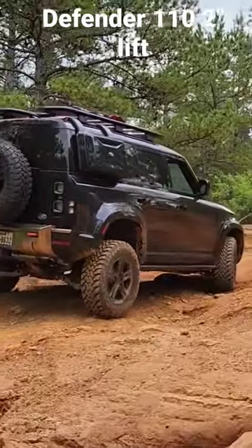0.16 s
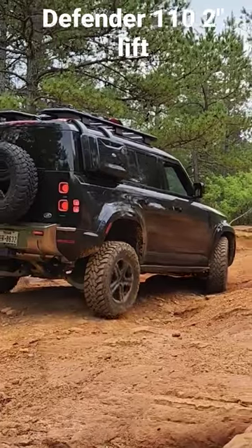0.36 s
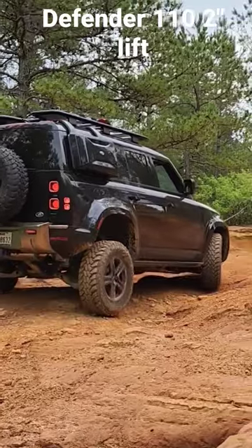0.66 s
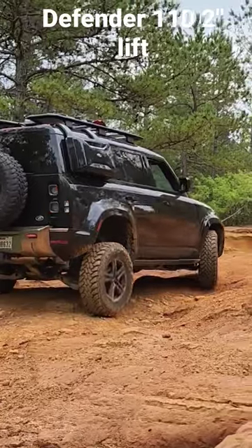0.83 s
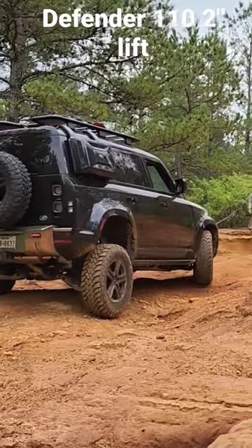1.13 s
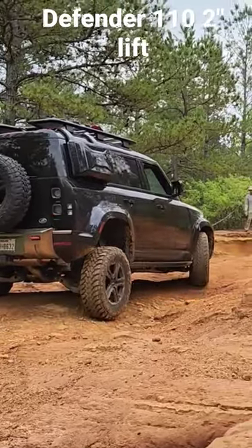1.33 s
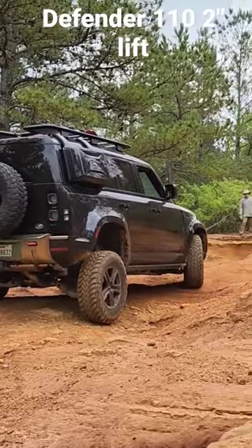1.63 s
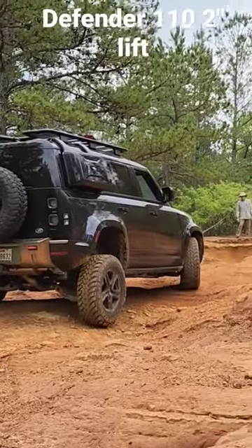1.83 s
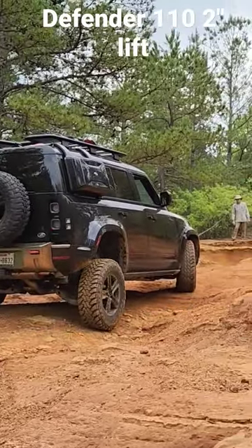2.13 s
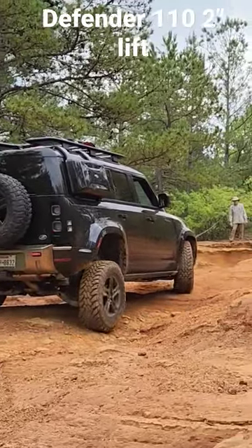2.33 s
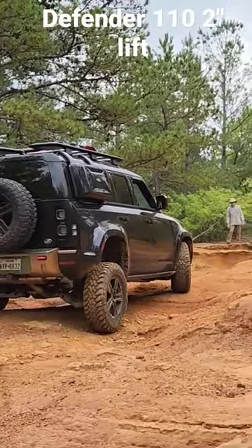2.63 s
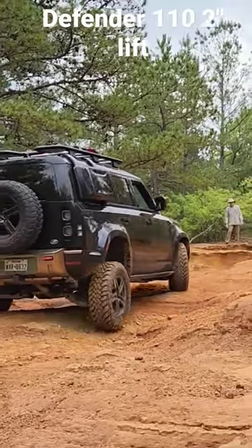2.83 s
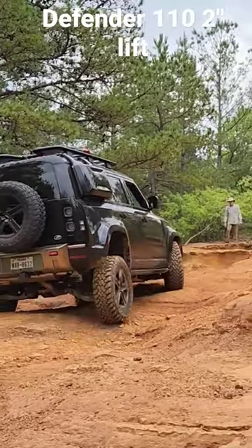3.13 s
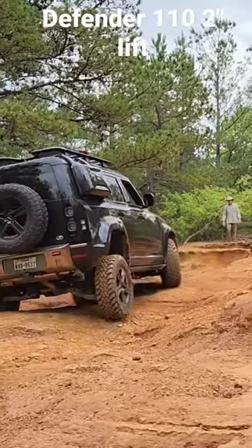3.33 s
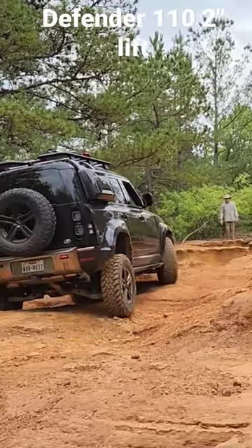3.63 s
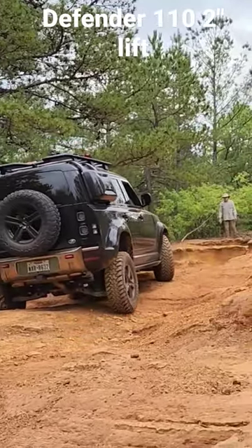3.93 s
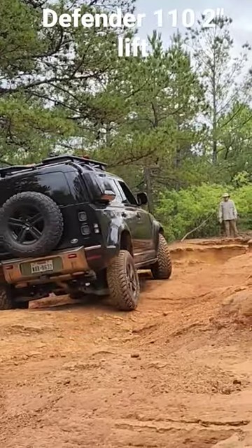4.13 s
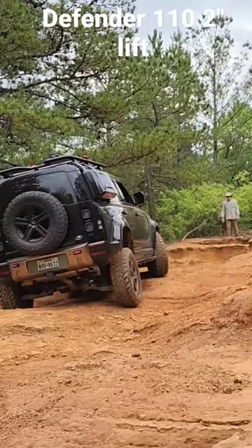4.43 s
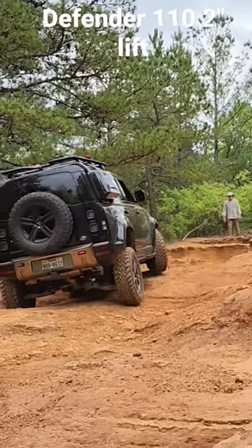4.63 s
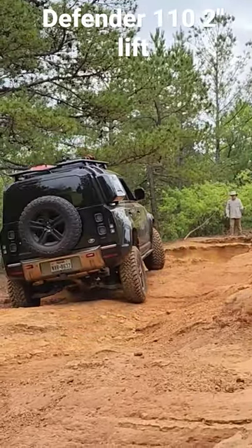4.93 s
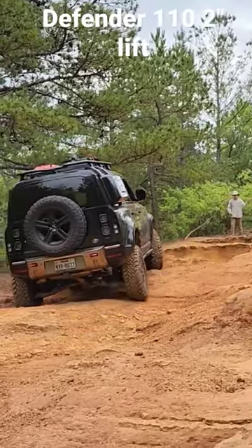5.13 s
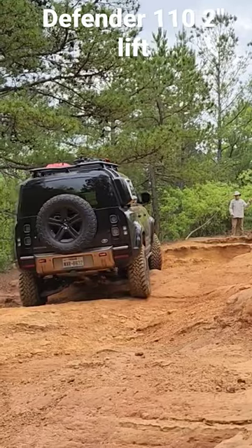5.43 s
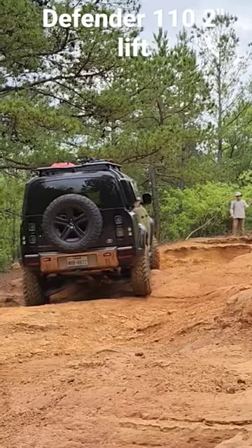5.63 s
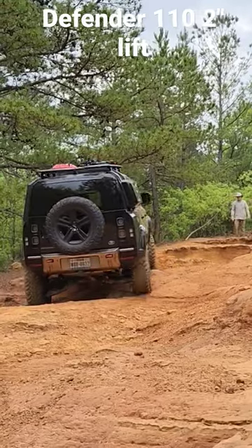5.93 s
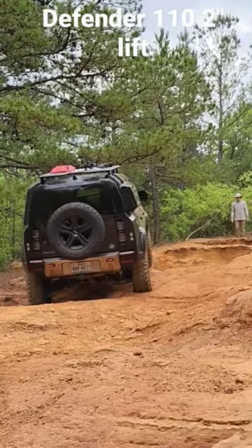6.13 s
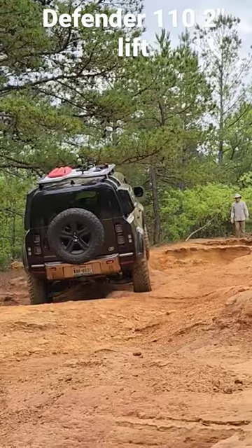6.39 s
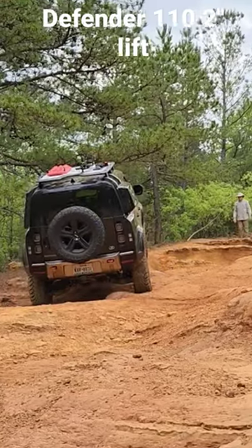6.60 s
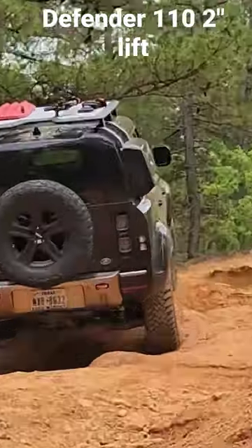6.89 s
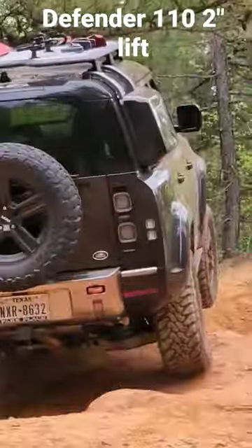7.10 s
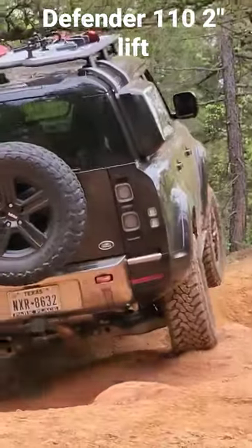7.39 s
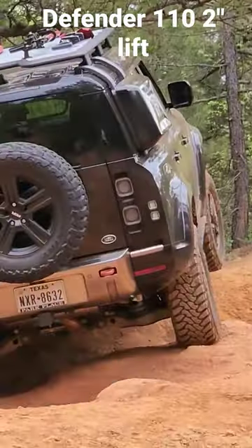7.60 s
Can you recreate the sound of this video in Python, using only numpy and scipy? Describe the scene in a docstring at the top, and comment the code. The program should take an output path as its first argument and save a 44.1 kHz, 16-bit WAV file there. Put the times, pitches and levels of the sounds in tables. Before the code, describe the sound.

A four-wheel-drive engine drones under load on a dirt trail, sagging, then revving higher, with underbody knocks and crunching grit.

```python
"""The exhaust of a six-cylinder four-wheel-drive crawling up a rocky dirt trail, heard from behind.
Its pulses drone through the pipe on the firing rate, which sags as a wheel hangs and climbs again.
The underbody rumbles, roars and rings with knocks, tyres crunch grit, the engine bay hisses, a thin
whine swells and the driveline groans under the hardest pull. Far off a cricket chirps.
The microphone stands in the open, near a dirt bank, and picks it all up through two unlike ports."""
import sys
import numpy as np
from scipy import signal
from scipy.fft import rfft, irfft, next_fast_len
from scipy.io import wavfile
from scipy.ndimage import uniform_filter1d

SR = 44100
rng = np.random.default_rng(int(sys.argv[2]) if len(sys.argv) > 2 else 0)


def master(y):
    """Save y as 16-bit WAV."""
    cut = np.clip(np.atleast_2d(y).T, -1, 1)
    pcm = np.round(cut * 32767)  # scale
    wavfile.write(sys.argv[1], SR, pcm.astype(np.int16))


N = 341889
TIME = np.arange(N) / SR


def from_db(db):
    """Gain of a level."""
    return 10 ** (np.asarray(db) / 20)


def rms_one(x):
    """Scale to rms 1."""
    return x / np.sqrt(np.mean(x ** 2) + 1e-20)


def in_time(rows):
    """Every column of a table after its time column, sample by sample."""
    times, *columns = np.transpose(rows)
    return [np.interp(TIME, times, column) for column in columns]


def at_hz(points, hz):
    """Read a spectrum on a log frequency axis."""
    freqs, values = np.transpose(points)
    return np.interp(np.log(hz), np.log(freqs), values)


def drift(rate_hz):
    """Slow random wander of rms 1."""
    pole = np.exp(-80 * np.pi * rate_hz / SR)
    slow = signal.lfilter([1], [1, -2 * pole, pole ** 2], rng.standard_normal(N // 40 + 2002))[2000:]
    return np.interp(np.arange(N) / 40, np.arange(len(slow)), rms_one(slow))


def bandpass(x, low_hz, high_hz, order=2):
    """Keep one band."""
    return signal.sosfilt(signal.butter(order, [low_hz, high_hz], "band", fs=SR, output="sos"), x)


def resonate(x, hz, width_hz):
    """A resonance with gain 1 at its peak."""
    r, w = np.exp(-np.pi * width_hz / SR), 2 * np.pi * hz / SR
    return signal.lfilter([(1 - r * r) / 2, 0, (r * r - 1) / 2], [1, -2 * r * np.cos(w), r * r], x)


def phase_lag(hz, centre_hz, q):
    """Radians by which a resonance delays a tone."""
    return np.arctan2(hz * centre_hz / q, centre_hz ** 2 - hz ** 2)


def strike(clicks, hz, t60, contact_cycles=.4):
    """A soft blow, lasting part of a cycle, sets one mode ringing."""
    contact = np.hanning(round(contact_cycles * SR / hz) + 2)
    r, w = from_db(-60 / (t60 * SR)), 2 * np.pi * hz / SR
    blow = contact / contact.sum() * np.sin(w)
    return signal.lfilter(blow, [1, -2 * r * np.cos(w), r * r], clicks + 1e-18)


def swell(centre_s, width_s):
    """A bell-shaped envelope of height 1."""
    return np.exp(-.5 * ((TIME - centre_s) / width_s) ** 2)


def bursts(times, levels_db, decays_s):
    """Envelopes that jump up and die away."""
    out = np.zeros(N)
    for start, db, decay in zip(times, levels_db, decays_s):
        at = round(start * SR)
        t = TIME[:min(N - at, SR // 5)]
        out[at:at + len(t)] += from_db(db) * np.exp(-t / decay) * np.minimum(t / .0007, 1)
    return out


def stereo_white():
    """A shared and an opposed white noise."""
    return rng.standard_normal((2, N))


# how alike diffuse sound is at the two microphone ports: (frequency [Hz], likeness [0-1])
PORT_LIKENESS = [(200, 0.97), (500, .9), (800, 1), (1050, 0.1), (1500, 0.3), (1900, 0.1), (2400, 0),
                 (3600, 0.4), (5500, 0.2), (9000, 0)]

def spread(pair, hz):
    """Mix shared and opposed parts into left and right."""
    alike = at_hz(PORT_LIKENESS, hz)
    return np.sqrt(1 + alike) * pair[0] + np.sqrt(1 - alike) * pair[1] * [[1], [-1]]


def banded_noise(spectrum, flicker_db, flicker_hz):
    """Third-octave bands of stereo noise, flickering partly together and partly alone; rms 1."""
    low_hz, high_hz = spectrum[0][0], spectrum[-1][0]
    edges = np.geomspace(low_hz, high_hz, round(3 * np.log2(high_hz / low_hz)) + 1)
    out, together, white = 0, drift(flicker_hz / 2), [stereo_white(), stereo_white()]
    for k, (low, high) in enumerate(zip(edges, edges[1:])):
        hz = np.sqrt(low * high)
        level_db = at_hz(spectrum, hz) + flicker_db * (0.7 * together + drift(flicker_hz))
        out = out + from_db(level_db) * spread(bandpass(white[k % 2], low, high), hz)
    return rms_one(out)


# a cricket, far off the trail: (time [s], rms level at the crest [dB])
CRICKET_CALLS = [(3.553, -60.5), (6.8, -60)]

def cricket(hz=4480, width_s=.009, gap_s=.044):
    """Each call is a pair of short pure chirps."""
    chirps = sum(from_db(db) * swell(s + gap, width_s) for s, db in CRICKET_CALLS for gap in (0, gap_s))
    return np.sqrt(2) * chirps * np.sin(2 * np.pi * hz * TIME)


# low rumble under the vehicle: (time [s], level [dB])
RUMBLE_LEVEL = [(0, -40), (1.0, -38.5), (2.5, -37), (4.0, -37), (4.6, -39.5), (5.6, -38), (6.6, -37),
                (7.0, -29), (7.75, -37.5)]
# its spectrum: (frequency [Hz], relative level [dB])
RUMBLE_SPECTRUM = [(20, -26.5), (35, -3), (55, 11.5), (90, -10.5), (150, -1.5), (230, -12), (330, -12.5),
                   (500, -35.5)]

def rumble():
    """The underbody rumbles with deep, uneven noise."""
    noise = banded_noise(RUMBLE_SPECTRUM, flicker_db=3, flicker_hz=6.2)
    return from_db(in_time(RUMBLE_LEVEL)[0]) * noise


# wheels slipping on the trail: (time [s], level [dB], fade [s])
WHEEL_SLIPS = [(3.979, -31, 0.36), (5.153, -25.5, 0.085), (6.03, -35, 0.12), (6.35, -29.5, 0.089),
               (6.77, -33.5, 0.51), (7.399, -38.5, 0.7)]

def chassis_shudder(hz=50.5, width_hz=38, rise_s=.04):
    """Noise in a low chassis resonance rises quickly at each slip and fades."""
    level = sum(from_db(db) * np.exp(np.where(TIME < s, (TIME - s) / rise_s, (s - TIME) / fade))
                for s, db, fade in WHEEL_SLIPS)
    lumps = resonate(rng.standard_normal(N), hz, width_hz)
    return level * rms_one(resonate(lumps, hz, width_hz))


# hiss from the engine bay, at the far end of the vehicle: (frequency [Hz], relative level [dB])
BAY_SPECTRUM = [(710, -31), (1200, -0.5), (1560, -3.5), (1780, -5), (1980, -8), (2780, -2), (5210, -3.5),
                (6360, -11), (7510, -22), (8000, -28), (10400, -51.5), (17600, -120)]
# metal parts in the bay: (frequency [Hz], width [Hz], gain [dB])
BAY_MODES = [(1560, 280, 4.5), (2021, 110, 9.5), (2330, 100, 0.5), (3680, 20, 1), (4330, 32, -6),
             (4850, 63, -5.5), (5400, 470, -9), (5740, 46, -1)]

def engine_bay():
    """Broad hiss with metal parts ringing in it; rms 1."""
    hiss = banded_noise(BAY_SPECTRUM, flicker_db=1, flicker_hz=17)
    rings = sum(from_db(db + 3 * drift(8)) * resonate(hiss, hz, width) for hz, width, db in BAY_MODES)
    return rms_one(hiss + rings)


# noise of the moving vehicle: (time [s], bay hiss [dB], underbody roar [dB], tyre sizzle [dB])
RUNNING_LEVELS = [(0.0, -52.5, -49, -69), (0.75, -51.5, -44.5, -64), (1.01, -54.5, -48.5, -70),
                  (1.53, -56.5, -49.5, -68.5), (1.7, -53, -46.5, -66.5), (2.19, -55.5, -46, -70),
                  (2.6, -53.5, -48, -68), (2.9, -53, -50, -69), (3.42, -55.5, -50, -66.5),
                  (3.78, -55.5, -50.5, -71), (4.09, -57.5, -49, -72.5), (4.67, -56, -50, -70.5),
                  (5.2, -57.5, -51, -75.5), (5.74, -54.5, -50, -70), (6.66, -56.5, -49.5, -76.5),
                  (7.1, -49.5, -41.5, -70.5), (7.24, -47.5, -44.5, -69), (7.72, -52.5, -50, -68)]
# roar from the underbody: (frequency [Hz], relative level [dB])
ROAR_SPECTRUM = [(180, -37.5), (300, -1), (483, -11.5), (566, 3), (724, -11), (883, -16), (1030, -13.5),
                 (1820, -25), (2000, -20.5), (2600, -44.5), (4400, -120)]
# sizzle of tyres on dirt: (frequency [Hz], relative level [dB])
SIZZLE_SPECTRUM = [(7000, -6), (8000, -2), (10800, -8), (12800, -13), (16000, -1.5)]

def running_noise(firing_phase, pump_depth=.16):
    """The underbody roars, pumped by each firing, while the bay hisses and the tyres sizzle."""
    hiss_db, roar_db, sizzle_db = in_time(RUNNING_LEVELS)
    roar = from_db(roar_db) * banded_noise(ROAR_SPECTRUM, flicker_db=2.5, flicker_hz=28)
    hiss = from_db(hiss_db) * engine_bay()
    sizzle = from_db(sizzle_db) * banded_noise(SIZZLE_SPECTRUM, flicker_db=1.5, flicker_hz=12)
    return roar * (1 + pump_depth * np.cos(firing_phase)) + hiss + sizzle


# roughness of the trail: (time [s], level against the roar [dB])
TRAIL_ROUGHNESS = [(0, -4), (3.9, 1.5), (4.2, 0), (6.6, -1.5), (6.9, 0.5), (7.7, 8.5)]

def ground_shaking():
    """How hard the ground shakes the panels and throws stones, in dB."""
    _, roar_db, _ = in_time(RUNNING_LEVELS)
    return roar_db + in_time(TRAIL_ROUGHNESS)[0]


# body panels: (frequency [Hz], width [Hz], relative level [dB])
PANEL_MODES = [(530, 120, -9.5), (664, 30, -10), (747, 10, -8), (1010, 81, -5)]

def panel_hum(shaking_db):
    """Shaken panels hum fitfully on their own pitches."""
    level = from_db(shaking_db - 9 + 3 * drift(30))
    return level * sum(from_db(db) * spread(rms_one(resonate(stereo_white(), hz, width)), hz)
                       for hz, width, db in PANEL_MODES)


# grit under the tyres: (time [s], relative level [dB], decay [s], sharpness [dB])
GRIT_SNAPS = [(0.71, -44.5, 0.072, 1), (1.551, -40, 0.0056, 7), (1.579, -45.5, 0.029, 6),
              (2.383, -49, 0.012, 6), (3.04, -42, 0.02, 5), (3.066, -42.5, 0.017, 2),
              (3.236, -38, 0.003, -4), (3.299, -47, 0.0087, 9), (3.449, -39, 0.0054, -5),
              (4.249, -41, 0.023, 3), (4.868, -53, 0.012, -1.5), (5.498, -46.5, 0.058, -9),
              (6.653, -46.5, 0.043, -3), (7.217, -44, 0.023, -4), (7.256, -38.5, 0.026, -4.5),
              (7.611, -41, 0.017, 2), (7.707, -42, 0.0079, 2)]

def tyre_crunch():
    """Grit snaps in short bursts of grainy noise, with a dull and a sharp part."""
    times, level_db, decay_s, sharp_db = np.transpose(GRIT_SNAPS)
    grains = stereo_white() * from_db(3 * np.minimum(rng.exponential(1, N), 3))
    dull = rms_one(spread(bandpass(grains, 1800, 6000), hz=4000))
    sharp = rms_one(spread(bandpass(grains, 6000, 14500), hz=9000))
    return (bursts(times, level_db - 6.5, decay_s) * dull
            + bursts(times, level_db + sharp_db - 20, decay_s) * sharp)


# taps of a loose part: (time [s], relative level [dB], low modes against high [dB])
LOOSE_TAPS = [(4.632, -41.5, 1), (4.651, -54.5, 6.5), (4.676, -56, 0), (4.797, -42, 2), (4.816, -55.5, 5.5),
              (4.84, -52.5, 3), (4.868, -63.5, 18.5)]
# its modes: (frequency [Hz], relative level [dB], t60 [s])
LOOSE_MODES = [(1876, 0, .028), (2207, -5, .022), (2540, -8, .022), (5766, -7, .03), (5940, 0, .033),
               (6205, -2, .03), (6480, -5, .014), (6934, -15, .015), (7340, -16, .015)]

def loose_part(scratch_s=.006, scratch_db=-15):
    """A small metal part rings as it taps; each tap drags on as a brief scratch."""
    times, tap_db, low_db = np.transpose(LOOSE_TAPS)
    scatter_db = rng.normal(0, 1.5, (len(times), len(LOOSE_MODES)))
    white, out = rng.standard_normal(N), np.zeros(N)
    for k, (hz, db, t60) in enumerate(LOOSE_MODES):
        level_db = tap_db + db + low_db * (hz < 3000) + scatter_db[:, k]
        force = bursts(times, level_db + scratch_db, np.full(len(times), scratch_s)) * white
        force[np.round(times * SR).astype(int)] += from_db(level_db) / 2
        out += strike(force, hz, t60)
    return bandpass(out, 1600, 7700, order=4)


# swells of a whine, perhaps from the driveline:
# (time [s], pitch [Hz], relative level [dB], width [s], glide [Hz/s], lower companion tone [dB])
WHINE_SWELLS = [(0.718, 743, -49, 0.13, 40.5, 1), (1.024, 714, -48.5, 0.035, 500, -12),
                (1.099, 752, -66, 0.045, 3, 11), (1.213, 764, -51.5, 0.036, 0, -12),
                (1.328, 745, -46, 0.056, -350, -5), (2.841, 730, -49.5, 0.089, -54, -2.5),
                (2.978, 750, -48, 0.026, 53, -14), (3.041, 720, -47, 0.032, 119, -4),
                (3.266, 741, -48.5, 0.054, -30, -5), (3.703, 733, -49, 0.099, 79.5, -5.5)]

def whine(companion_ratio=.79):
    """Two thin tones, never quite steady, glide together in each swell."""
    wander = 2 * np.pi * np.cumsum(9 * drift(14)) / SR
    out = np.zeros(N)
    for s, hz, db, width_s, glide, companion_db in WHINE_SWELLS:
        t = TIME - s
        phase = 2 * np.pi * (hz + glide * t / 2) * t + wander
        tones = np.sin(phase) + from_db(companion_db) * np.sin(companion_ratio * phase)
        out += from_db(db) * swell(s, width_s) * tones
    return np.sqrt(2) * from_db(2.5 * drift(35) - 2) * out


# groan of the driveline, faint until the hardest pull: (time [s], level [dB])
GROAN_LEVEL = [(6.6, -72), (6.9, -55.5), (7.05, -51), (7.15, -48), (7.25, -43), (7.4, -67), (7.75, -56)]
# driveline resonances: (frequency [Hz], width [Hz], relative level [dB])
DRIVELINE_MODES = [(1010, 47, -7), (1070, 37, -1.5), (1280, 70, -2.5), (1490, 58, 2.5), (1920, 57, -1.5),
                   (2280, 90, -7.5)]

def driveline_groan(firing_phase, pump_depth=.58):
    """Noise pumped by each firing rings fitfully in a few metal resonances."""
    pumped = stereo_white() * (1 + pump_depth * np.cos(firing_phase))
    rings = sum(from_db(db + 2 * drift(12)) * spread(rms_one(resonate(pumped, hz, width)), hz)
                for hz, width, db in DRIVELINE_MODES)
    return from_db(in_time(GROAN_LEVEL)[0]) * rms_one(rings)


# knocks under the vehicle: (time [s], relative level [dB], thud [dB], clang [dB], ring [dB], crack [dB])
UNDERBODY_KNOCKS = [(0.043, -25, 5, -5, 3, -9), (0.22, -26.5, -5, -5, 6.5, -3), (0.467, -24, 0, -15, 0, -9),
                    (0.559, -26, -10, -10, -12, -10), (0.663, -26.5, -8, -8, -4, -10),
                    (0.715, -27, 15, -3, -4, -4), (0.727, -22.5, 1, -1, 3, 12),
                    (0.8386, -16, -21, 5, -4, -10), (0.845, -35, -5, -2, -6, -8),
                    (0.8645, -4, 3, -0.5, -15, -0.5), (0.8737, -10, -5, 3, 4, 1.5),
                    (0.889, -5.5, -5, -13, -14, -5), (0.896, -21.5, -3, -1, 7, -2),
                    (0.908, -16, 3, -4, -18, -6), (0.921, -21, -11, -3, -8, -8), (0.94, -23, 3, -3, -7, -3),
                    (1.747, -20.5, 0, 7, 12.5, -15), (1.764, -21, -2, -3, 1, -9), (1.811, -34, 0, 0, 3, -8),
                    (1.989, -24, -5, -2, 7, -2), (1.996, -28, 3, -8, -5, -4), (2.068, -30, 16, 5, -4, -12),
                    (2.145, -25.5, 0, -10, 2, -8), (2.207, -30, 13.5, -4, 6, -4),
                    (2.2442, -22, 18, 4.5, 1, -5), (2.259, -25, -4, 3, 11, 0.5),
                    (2.275, -24.5, 10, 1, 4, 2), (3.033, -27, -4, 4.5, 7.5, 18.5),
                    (3.068, -35, 2, 5, -5, 21.5), (3.071, -23, -10, 0, 1.5, -7),
                    (3.235, -39.5, -3, 0, 4, 17), (3.446, -27, -3, -6, 4, -10), (3.613, -24, 3, -10, -2, 1),
                    (3.833, -21.5, -4, -2, 6, 2), (5.707, -30, 6, -1, 1, -10),
                    (5.83, -29, -0.5, -4, 5.5, 0), (7.145, -36.5, 8, 15.5, 19.5, 2.5)]
# modes of the underbody: (frequency [Hz], relative level [dB], t60 [s])
UNDERBODY_MODES = [(209, -19, 0.044), (304, -12.5, 0.042), (395, -10.5, 0.066), (530, -12, 0.04),
                   (640, -7, 0.055), (747.6, 1, 0.049), (810, -2, 0.045), (930, -3.5, 0.036),
                   (1026.2, 1, 0.027), (1316, -10, 0.031), (1417, -7.5, 0.029), (1590, -12, 0.007),
                   (2200, -14, 0.007), (2620, -12.5, 0.01), (3300, -10, 0.0071), (4000, -15.5, 0.0032),
                   (5400, -22, 0.0026)]

def underbody_knocks(shaking_db, stones_per_s=120):
    """Knocks, and small stones thrown up at random, strike the same modes with new strengths each time."""
    times, knock_db, thud_db, clang_db, ring_db, crack_db = np.transpose(UNDERBODY_KNOCKS)
    at = np.round(times * SR).astype(int)
    scatter_db = rng.normal(0, 1.5, (len(times), len(UNDERBODY_MODES)))
    size_db = 4 * np.minimum(rng.exponential(1, N), 1.5)
    stones = (rng.random(N) < stones_per_s / SR) * from_db(shaking_db + size_db - 18.5)
    out = np.zeros(N)
    for k, (hz, db, t60) in enumerate(UNDERBODY_MODES):
        colour_db = np.select([hz < 550, hz > 2000, hz > 1150, hz > 880],
                              [thud_db, crack_db, ring_db, clang_db])
        force = stones * rng.uniform(0.23, 1, N) * from_db(db)
        force[at] -= from_db(knock_db + db - 14 + colour_db + scatter_db[:, k])
        out += strike(force, hz, t60)
    return out


def bank_slap(hits, lags_s=(.0043, .0071)):
    """The dirt bank throws one faint echo back to each port."""
    return from_db(-19) * np.array([np.roll(hits, round(lag * SR)) for lag in lags_s])


# the engine on the climb: (time [s], firing rate [Hz], load [dB])
ENGINE_CLIMB = [(0.0, 63.1, -26.5), (0.15, 65.4, -22.5), (0.27, 68.4, -20), (0.51, 69.9, -29),
                (0.74, 64.2, -33), (0.85, 57.16, -36), (1.0, 47.84, -34), (1.1, 44.56, -20.5),
                (1.2, 39.8, -14), (1.36, 42.8, -10.5), (1.67, 49.95, -15.5), (1.94, 54.58, -19.5),
                (2.16, 58.3, -21.5), (2.54, 62.1, -22), (2.88, 64.03, -23), (3.15, 62.57, -24.5),
                (3.3, 61.8, -27.5), (3.67, 67.18, -34), (3.9, 66.1, -31.5), (4.27, 64.3, -26.5),
                (4.5, 68.04, -23), (4.75, 70.07, -22.5), (5.0, 70.4, -21), (5.22, 72.15, -18.5),
                (5.45, 77.14, -16), (5.69, 80.84, -14.5), (5.92, 81.7, -14.5), (6.1, 83.8, -15.5),
                (6.3, 81.8, -14.5), (6.45, 81.87, -13.5), (6.56, 83.5, -15), (6.7, 90.33, -16),
                (6.84, 93.46, -11.5), (7.0, 97.8, -10.5), (7.1, 96.27, -10), (7.25, 94.8, -8.5),
                (7.48, 95.56, -9), (7.75, 99.28, -10.5)]

def engine(flywheel_s=.08):
    """Firing rate, phase and load; the flywheel's inertia rounds every change of speed."""
    firing_hz, load_db = in_time(ENGINE_CLIMB)
    firing_hz = uniform_filter1d(firing_hz, size=round(flywheel_s * SR))
    firing_phase = 2 * np.pi * np.cumsum(firing_hz + 0.13 * drift(10)) / SR
    return firing_hz, firing_phase, load_db


# firing orders 1-13: (relative level [dB], share of the load's swing followed [0-1])
FIRING_ORDERS = [(0.5, 1.0), (-18.5, .5), (-31, .4), (-47.5, .2), (-52, .2), (-53, .4), (-54, .7),
                 (-52.5, .7), (-54.5, .7), (-53.5, .8), (-57, .8), (-57.5, .8), (-55.5, .8)]
# level of the orders above the third; the exhaust note brightens and dulls: (time [s], gain [dB])
UPPER_ORDER_LEVEL = [(0, 6.5), (.6, -4), (1.1, 0.5), (2.0, -6), (3.2, -11), (3.7, 2.5), (4.2, -4), (4.7, 7),
                     (5.5, 4), (6.3, 1), (7.0, 8.5), (7.3, 3), (7.7, 6)]
# what the exhaust pipe lets out: (frequency [Hz], gain [dB])
PIPE_RESPONSE = [(40, -21.5), (52, 0.5), (64, 6.5), (78, -6.5), (95, -4), (125, 7), (145, 7), (170, -2.5),
                 (197, -2), (208, -9), (230, -3), (265, 4), (285, 6.5), (320, -2.5), (350, -12), (400, 2),
                 (480, -11.5), (580, -1.5), (680, -13.5), (770, -3.5), (870, -12.5), (1000, -5), (1300, -8)]
# tones left by unequal cylinders: (multiple of the crank rate, relative level [dB])
CRANK_ORDERS = [(1, -48.5), (2, -49.5), (4, -39), (5, -37), (7, -39.5), (8, -44), (10, -51.5), (11, -57.5),
                (13, -59), (14, -66), (16, -62.5), (20, -61)]

def exhaust(firing_hz, firing_phase, load_db):
    """Tones on the firing rate; the pipe colours and delays each by its pitch and so shapes the pulse."""
    upper_db, = in_time(UPPER_ORDER_LEVEL)
    stumble_db = 2.5 * swell(centre_s=1.104, width_s=.09)  # near the stall firings grow weak and uneven
    out = np.zeros(N)
    for k, (db, share) in enumerate(FIRING_ORDERS, 1):
        hz = k * firing_hz
        # the silencer's resonance and anti-resonance
        lag = phase_lag(hz, centre_hz=46, q=6) - phase_lag(hz, centre_hz=235, q=4)
        level_db = db + share * load_db + at_hz(PIPE_RESPONSE, hz) + upper_db * (k > 3) - stumble_db
        uneven_db = (0.3 + 0.11 * k + stumble_db) * drift(15)  # firings vary most in their overtones
        out += from_db(level_db + uneven_db) * np.cos(k * firing_phase - lag)
    crank_phase = firing_phase / 3  # three firings a turn
    for k, db in CRANK_ORDERS:
        level_db = db + 0.24 * load_db + 3 * drift(4.9)
        out += from_db(level_db) * np.cos(k * crank_phase + rng.uniform(0, 2 * np.pi))
    return np.sqrt(2) * out


def scene():
    """The climbing vehicle and the far cricket, from a spot on the trail behind."""
    firing_hz, firing_phase, load_db = engine()
    shaking_db = ground_shaking()
    hits = underbody_knocks(shaking_db) + loose_part()
    body = rumble() + chassis_shudder() + panel_hum(shaking_db) + running_noise(firing_phase)
    drive = exhaust(firing_hz, firing_phase, load_db) + driveline_groan(firing_phase) + whine()
    return cricket() + body + tyre_crunch() + hits + bank_slap(hits) + drive


# colour of the microphone's ports: (frequency [Hz], left minus right [dB])
MIC_BALANCE = [(60, .5), (200, 1.08), (520, 1.5), (1060, 2), (1720, -1.5), (2770, -2), (3520, -4.5),
               (4470, -11.5), (5680, -11), (6400, -8), (7400, 11.5), (8300, 0), (11700, 6), (14800, 6)]
# delay between the ports: (frequency [Hz], lag of the right port [ms])
MIC_LAG = [(1000, .1), (1400, .18), (1650, .22), (1850, .46), (2300, .38), (3200, .295), (4500, .27)]

def record(dry, cutoff_hz=15500):
    """Each microphone port has its own colour and the right one hears later; the top is cut."""
    size = next_fast_len(N + 4096)
    hz = np.maximum(np.arange(size // 2 + 1) * SR / size, 1)
    tilt = from_db(at_hz(MIC_BALANCE, hz) / 2)
    late = np.exp(-2j * np.pi * hz * at_hz(MIC_LAG, hz) / 1000)
    ports = irfft(rfft(dry, size) * np.array([tilt, late / tilt]), size)[:, :N]
    return signal.sosfilt(signal.cheby2(24, 60, cutoff_hz, fs=SR, output="sos"), ports)


dry = scene()
out = record(dry)
master(out)
```